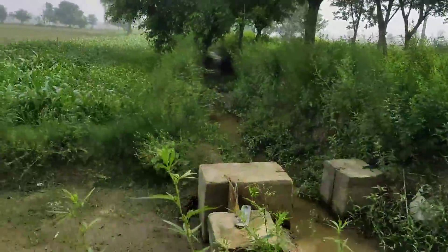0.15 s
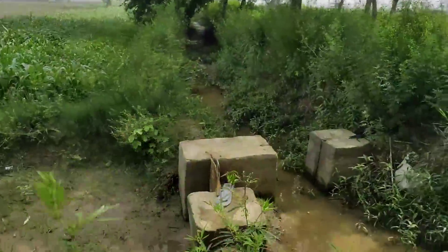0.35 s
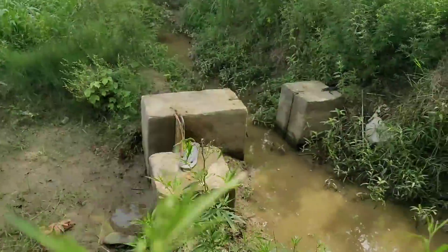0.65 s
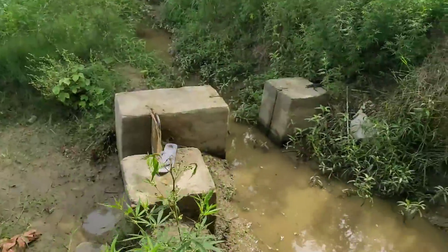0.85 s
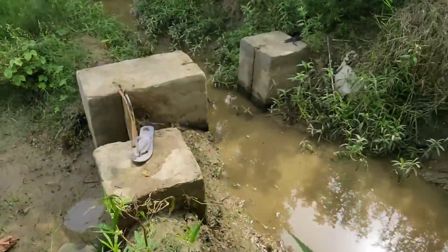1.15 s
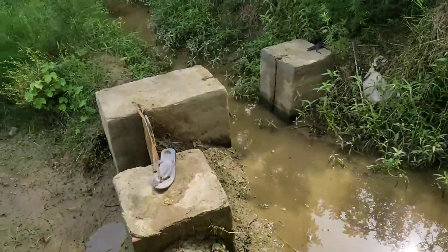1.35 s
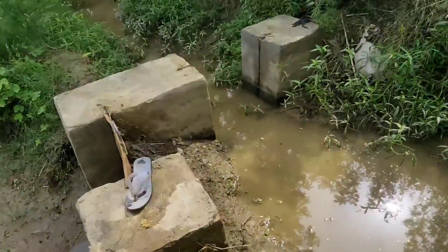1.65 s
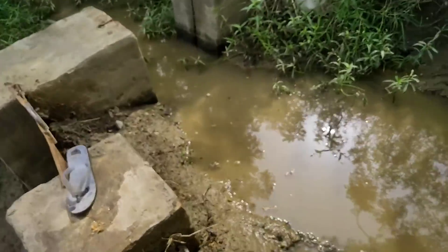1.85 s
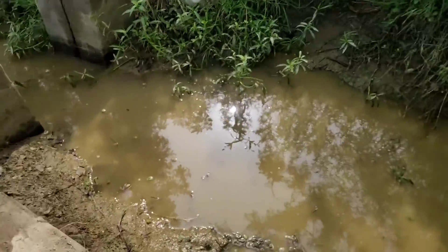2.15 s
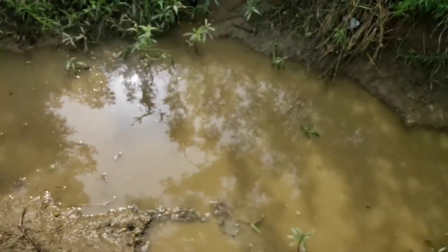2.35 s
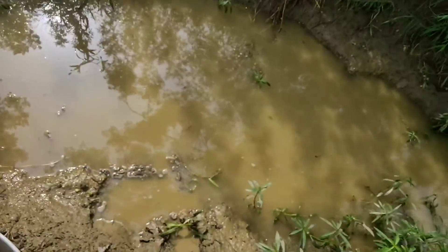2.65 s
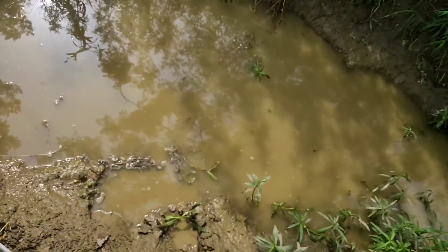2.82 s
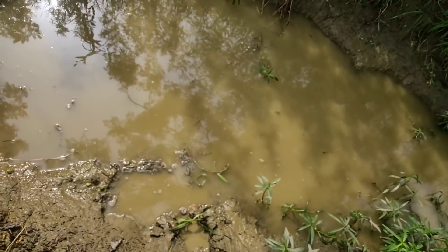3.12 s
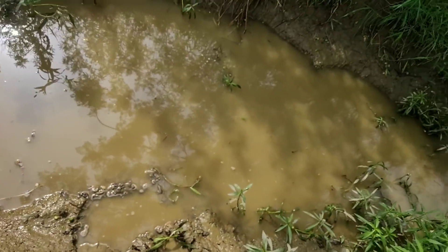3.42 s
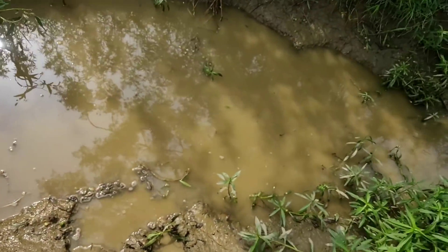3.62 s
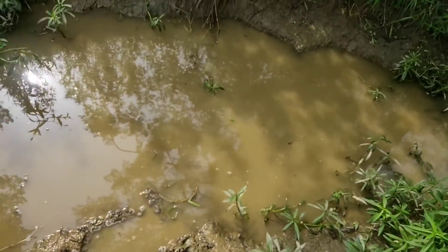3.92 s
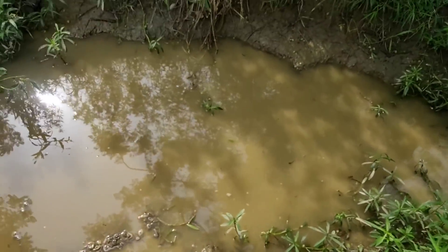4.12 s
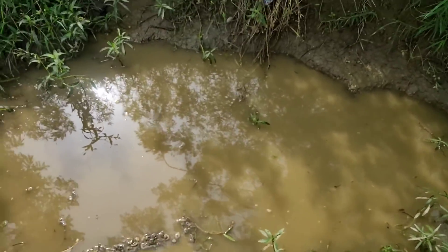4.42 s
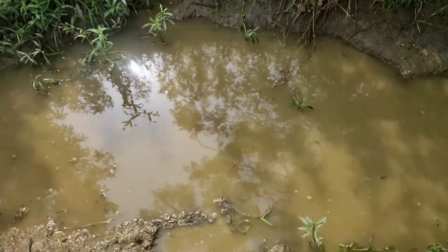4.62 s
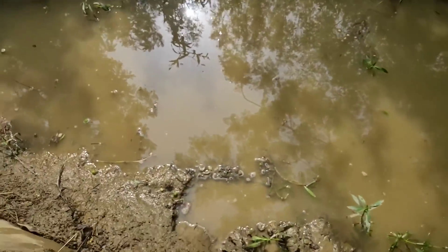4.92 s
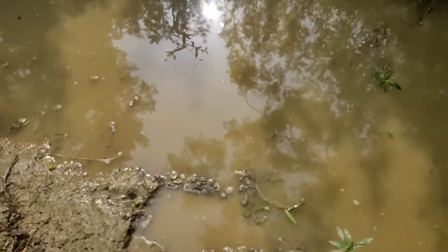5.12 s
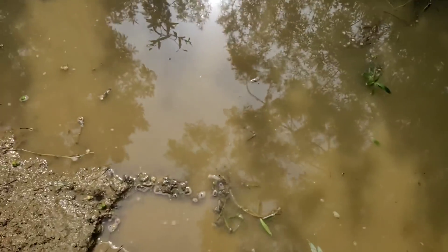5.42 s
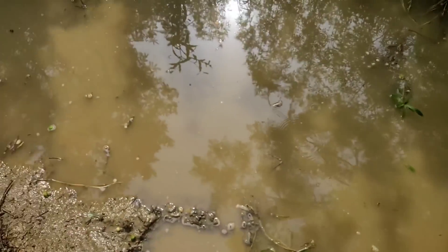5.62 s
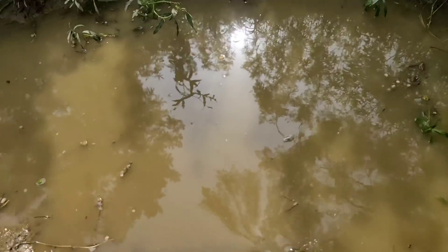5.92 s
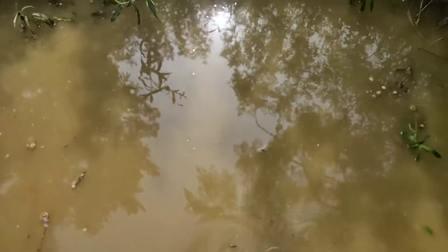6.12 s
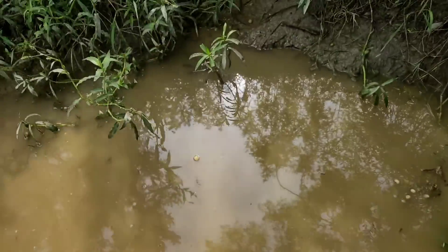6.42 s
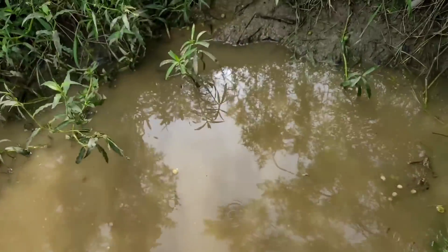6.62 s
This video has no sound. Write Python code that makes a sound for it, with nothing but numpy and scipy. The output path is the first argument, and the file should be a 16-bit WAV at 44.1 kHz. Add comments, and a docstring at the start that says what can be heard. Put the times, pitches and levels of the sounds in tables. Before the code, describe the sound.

Faint birds and rustling weeds around a sheet-metal bucket that knocks, scrapes and rattles its handle before dipping into shallow water.

```python
"""A wet field rustles, stems tick and a far bird whistles; a second one later chirps. From 1.3 s a
sheet-metal bucket is carried through the weeds, its wire handle striking the rim and exciting the shell's
modes. It is set down with a thud at 3.1 s and scrapes by stick-slip friction; at 4.3 s the handle drops
and bounces. From 5.9 s a muddy pool laps and spits round it, its bubbles ringing as resonators.
The left microphone is the brighter one and lies further from the bucket."""
import sys
import numpy as np
from scipy import signal
from scipy.fft import rfft, irfft, next_fast_len
from scipy.io import wavfile
from scipy.ndimage import uniform_filter1d, map_coordinates

SR = 44100
rng = np.random.default_rng(int(sys.argv[2]) if len(sys.argv) > 2 else 0)


def inscribe(sig):
    """Save sig as 16-bit PCM at rate SR to the path in sys.argv[1].

    A 1-D sig is mono; a 2-D sig holds one channel per row.
    Samples are clipped to [-1, 1] before scaling.
    """
    pcm = np.round(np.clip(np.atleast_2d(sig).T, -1, 1) * 32767)
    wavfile.write(sys.argv[1], SR, pcm.astype(np.int16))


N = 298557
TIME = np.arange(N) / SR
LEFT_RIGHT = np.array([[1], [-1]])


def amp(db):
    return 10 ** (np.asarray(db) / 20)


def unit_rms(x):
    return x / np.sqrt(np.mean(x ** 2) + 1e-20)


def along(points, hz):
    """Interpolation of (f, value) points on a logarithmic frequency axis."""
    f, value = np.transpose(points)
    return np.interp(np.log(hz + 1), np.log(f + 1), value)


def wobble(rate):
    """Smooth random modulation with rate knots a second."""
    return map_coordinates(rng.standard_normal(int(N * rate / SR) + 4), [TIME * rate])


def add(track, s, sound):
    """Superposition of a sound starting at time s."""
    part = track[..., round(s * SR):][..., :sound.shape[-1]]
    part += sound[..., :part.shape[-1]]


def filtered(x, response):
    """Linear filtering: the spectrum times a frequency response."""
    size = next_fast_len(N + SR // 2)
    return irfft(rfft(x, size) * response(np.fft.rfftfreq(size, 1 / SR)), size)[..., :N]


def lagged(x, lag_s):
    """Path difference: the left channel lags the right by lag_s."""
    return filtered(x, lambda f: np.exp(-1j * np.pi * f * lag_s * LEFT_RIGHT))


def noise(spectrum, coherence, patchy_db):
    """Partly coherent stereo noise, its gain varying in random patches of time and frequency."""
    def mid_side(hz):
        angle = np.arccos(np.clip(along(coherence, hz), -1, 1)) / 2
        return amp(along(spectrum, hz)) * [np.cos(angle), np.sin(angle)]
    white = signal.stft(rng.standard_normal((2, N)), nperseg=512)[2]
    patches = uniform_filter1d(uniform_filter1d(rng.standard_normal(white.shape[1:]), 6, 0), 8, 1)
    pair = signal.istft(white * amp(patchy_db * unit_rms(patches)), nperseg=512)[1][:, :N]
    mid, side = filtered(pair, mid_side)
    return np.array([mid + side, mid - side]) / np.std(mid)


def swells(rows, fall_db_per_s):
    """Exponential rise (40 dB), hold and decay: one envelope per level column, set by the loudest row."""
    s, rise, hold, *levels = np.transpose(rows)[:, :, None]
    t = TIME[::40]
    rise_db = -40 * np.maximum(s - t, 0) / np.maximum(rise, .003)
    fall_db = -fall_db_per_s * np.maximum(t - s - hold, 0)
    return [np.interp(TIME, t, amp(np.max(db + rise_db + fall_db, axis=0))) for db in levels]


# Spectra of far rumble, weeds, wet leaves and a faint high hiss: f/Hz, level/dB
RUMBLE = [(12, -38), (20, -23.5), (75, 2), (155, 0), (189, -2.5), (321, -6.5), (359, -13.5), (600, -20.5),
          (780, -49), (1320, -120)]
RUSTLE = [(240, -38), (400, -5.5), (1110, -1.5), (1380, -5), (1860, -1.5), (4500, -10.5), (5850, -28.5),
          (9900, -120)]
HISS = [(2350, -37), (4000, -20.5), (4700, -9), (5710, -1), (6460, 3), (7850, -2), (10000, -17),
        (13000, -48), (22000, -120)]
HIGH_HISS = [(5590, -32.5), (9500, -0.5), (11500, -4), (14900, -1), (16000, -11.5)]
# Envelope of the foliage: t/s, rustle level/dB, hiss level/dB
FOLIAGE_LEVEL = [(0.0, -61, -65), (0.71, -67.5, -65.5), (1.04, -59, -54.5), (1.42, -61, -64),
                 (1.99, -67.5, -67.5), (2.5, -70.5, -66.5), (2.71, -74, -69), (3.15, -81, -86),
                 (3.3, -70.5, -69), (4.3, -69.5, -75), (4.85, -77, -74), (5.18, -70, -68),
                 (5.5, -71, -68.5), (5.93, -73, -76), (6.45, -65, -71.5), (6.66, -67, -67)]
# Envelopes of the rumble and of the faint high hiss, which dies away after 4.5 s (re hiss): t/s, level/dB
RUMBLE_LEVEL = [(0.0, -58), (3.3, -58.5), (4.25, -55.5), (6.4, -53), (6.7, -58.5)]
HIGH_HISS_LEVEL = [(0.0, -9), (2.9, -9), (4.5, -7.5), (4.9, -22), (6.7, -31.5)]
# Likeness of left and right: f/Hz, coherence
COHERENCE = [(60, 1), (240, 0.3), (950, 0.54), (3770, 0.037), (15000, 0.03)]

def field():
    """Amplitude-modulated noise: far rumble, weeds brushing past and the hiss of wet leaves."""
    s, *levels = np.transpose(FOLIAGE_LEVEL)
    rustle_db, hiss_db = (np.interp(TIME, s, db) for db in levels)
    rumble_db = np.interp(TIME, *np.transpose(RUMBLE_LEVEL))
    high_hiss_db = hiss_db + np.interp(TIME, *np.transpose(HIGH_HISS_LEVEL))
    brush = wobble(19)
    return (amp(rumble_db + 1.8 * wobble(7.3)) * noise(RUMBLE, COHERENCE, patchy_db=2)
            + amp(rustle_db + .85 * brush) * noise(RUSTLE, COHERENCE, patchy_db=2)
            + amp(hiss_db + .6 * brush) * noise(HISS, COHERENCE, patchy_db=1.5)
            + amp(high_hiss_db + .8 * brush) * noise(HIGH_HISS, COHERENCE, patchy_db=-0.5))


# Rising whistles: t/s, duration/s, start f/Hz, end f/Hz, glide exponent, relative level/dB
SLIDES = [(0.308, 0.14, 1264, 1406, 0.44, -68.5), (1.14, 0.35, 1085, 1385, 1.3, -62)]
# Whistled phrases: t/s, duration/s, top f/Hz, relative level/dB
PHRASES = [(1.63, 0.22, 1170, -70), (1.93, 0.2, 1256, -63), (2.227, 0.22, 1309, -60),
           (2.536, 0.22, 1347, -60)]
# Contour of a phrase, two rising notes and a fall: share of duration, f over top f, level/dB
CONTOUR = [(0., .79, -4), (.31, .91, -5.5), (.48, .83, -9), (.66, 1.014, 1), (.82, .88, -2),
           (1., 0.682, -11.5)]

def whistler():
    """Frequency modulation: a bird's pure tone glides while its level wavers."""
    song = np.zeros(N)
    for s, length, low_hz, high_hz, bow, db in SLIDES:
        u = np.linspace(0, 1, round(length * SR))
        pitch = low_hz + (high_hz - low_hz) * u ** bow
        envelope = amp(db - 4.6 * (2 - u)) * np.sin(np.pi * u) ** .3
        add(song, s, envelope * np.sin(2 * np.pi * np.cumsum(pitch) / SR))
    share, bend, bend_db = np.transpose(CONTOUR)
    for s, length, top_hz, db in PHRASES:
        u = np.linspace(0, 1, round(length * SR))
        pitch = uniform_filter1d(top_hz * np.interp(u, share, bend), size=600)
        envelope = amp(db + np.interp(u, share, bend_db)) * np.sin(np.pi * u) ** .26
        add(song, s, envelope * np.sin(2 * np.pi * np.cumsum(pitch) / SR))
    return song * amp(8.5 + 2.3 * wobble(27))


def chirper(count=10, first_s=2.378, period_s=0.3692, start_hz=3800, fall_hz_per_s=25000):
    """Linear frequency sweeps: a small bird's evenly spaced falling chirps."""
    song, t = np.zeros(N), np.arange(round(0.041 * SR)) / SR
    chirp = np.hanning(len(t)) * np.sin(2 * np.pi * (start_hz * t - fall_hz_per_s * t * t / 2))
    for k in range(count):
        add(song, first_s + k * period_s, amp(rng.normal(-59.5, 1.5)) * chirp)
    return song


def birds(t60=0.3):
    """Scattering: the two far birds arrive directly and as diffuse echoes from trees."""
    song, t = whistler() + chirper(), np.arange(SR // 5) / SR
    trees = amp(-60 * t / t60) * rng.standard_normal((2, len(t)))
    echo = signal.fftconvolve(song[None], trees / np.linalg.norm(trees[0]), axes=1)[:, :N]
    return lagged(song, lag_s=0.00017) + amp(-11) * echo


# Ticks of stems and drops: t/s, relative level/dB, centre f/Hz, 30 dB decay/s, leftward bias/dB
TICKS = [(0.1465, -40.5, 1100, 0.005, -17), (0.15, -35, 6200, 0.003, -8), (0.156, -41, 1700, 0.0095, -21),
         (0.162, -35, 1600, 0.01, -16), (0.163, -49, 10000, 0.002, -12), (0.1681, -17.5, 830, 0.0056, -17),
         (0.1683, -28.5, 5560, 0.0018, -15.5), (0.18, -43, 2000, 0.011, -19),
         (0.289, -38.5, 2480, 0.002, 15), (0.443, -51, 6390, 0.004, 18), (0.517, -46, 1220, 0.0031, -24),
         (0.553, -50, 1200, 0.0059, -23), (2.328, -53, 1146, 0.0056, -4), (2.38, -51, 1280, 0.0042, 0),
         (2.79, -45, 6560, 0.0042, 10), (4.045, -47, 743, 0.0035, 1), (4.204, -48.5, 755, 0.0044, 0),
         (5.149, -36, 6600, 0.0035, 12.5), (5.18, -41, 1250, 0.0049, 13), (5.192, -38.5, 1130, 0.0059, 12),
         (5.332, -38.5, 7050, 0.003, 18), (5.387, -48, 6940, 0.004, 14), (5.525, -44.5, 7700, 0.0044, 18)]

def ticks():
    """Impulse excitation of a damped resonance; ticks biased to the right reach the left channel late."""
    out, t = np.zeros((2, N)), np.arange(SR // 20) / SR
    for s, db, hz, decay_s, pan_db in TICKS:
        snap = (rng.standard_normal(len(t)) + 6 * (t == 0)) * amp(-30 * t / decay_s)
        click = signal.lfilter(*signal.iirpeak(hz, 2.1 * (hz / 1000) ** 1.02, SR), snap)
        click = signal.lfilter(*signal.butter(2, min(3 * hz, 11000), fs=SR), click)
        click = signal.lfilter(*signal.butter(1, 0.63 * hz, 'high', fs=SR), click)
        click *= amp(db + 1.5) / np.abs(click).max()
        add(out[0], s + max(0, -pan_db) * 4e-5, amp((pan_db - 17) / 2) * click)
        add(out[1], s, amp((0.5 - pan_db) / 2) * click)
    return out


def bubble(t, hz, cycles, rise):
    """Bubble resonance: a damped sine whose pitch climbs as it nears the surface."""
    u = t * hz / cycles
    return np.sin(2 * np.pi * hz * t * (1 + rise * u)) * np.exp(-3 * u) * (1 - np.exp(-t * hz / 0.5))


# Drops in the pool: t/s, relative level/dB, f/Hz, spit level/dB re drop
DROPS = [(5.973, -47, 3300, 0), (5.994, -42, 5430, -13), (6.004, -32, 1730, -7.5), (6.026, -43, 3240, -4),
         (6.052, -44, 1610, 3), (6.075, -36, 1550, -7), (6.085, -41.5, 896, 4), (6.113, -30.5, 3580, -4),
         (6.127, -38, 2860, -13), (6.149, -38.5, 1000, -21), (6.172, -41, 3980, -9),
         (6.195, -29.5, 4690, -9), (6.204, -36.5, 1000, -10), (6.22, -30, 1135, -4), (6.237, -40, 3340, -5),
         (6.26, -43, 826, -12), (6.277, -38, 905, -3.5), (6.288, -34, 1620, -0.5), (6.297, -34.5, 482, -14),
         (6.308, -36.5, 636, -16), (6.316, -31.5, 790, -26), (6.314, -40, 3460, -11),
         (6.333, -36, 860, -15.5), (6.351, -40.5, 1160, -6.5), (6.437, -42, 1033, -12),
         (6.688, -53, 3380, 11), (6.704, -34, 884, -10), (6.754, -31, 805, -25), (6.761, -32, 1200, -11),
         (6.48, -51, 2850, -21)]
# Splashes: full at t/s, rise/s, hold/s, relative level/dB
SPLASHES = [(5.958, 0.018, 0.39, -56), (6.222, .015, 0.025, -49), (6.286, 0.018, 0.0096, -47),
            (6.43, 0.029, 0.012, -60), (6.706, 0.074, .07, -46.5)]
# Spectrum of the spray: f/Hz, level/dB
SPRAY = [(350, -38), (700, -3), (2000, -12), (3500, -9), (4360, -19.5), (6290, -0.5), (10800, -25),
         (14800, -22), (16200, -34)]

def water(bubbles=700, start_s=5.9):
    """Free oscillation of bubbles: one per drop, with a spit of spray, and a fizz of many per splash."""
    drops, spit, fizz = np.zeros(N), np.zeros(N), np.zeros((2, N))
    t = np.arange(SR // 25) / SR
    for s, db, hz, spit_db in DROPS:
        cycles = 11 + 3.5 * np.log2(hz / 1000)  # smaller bubbles ring more cycles
        add(drops, s, amp(db + .5) * bubble(t, hz, cycles, rise=0.06))
        add(spit, s, amp(db + spit_db + 1.5 - 60 * t / 0.009))
    for when, pitch, size, pan in rng.random((bubbles, 4)):
        blip = amp(11.5 * size ** 3) * bubble(t[:600], 700 * 12 ** pitch, cycles=4.5, rise=0.15)
        add(fizz, start_s + when * (N / SR - start_s), blip * amp(22 * (pan - .5) * LEFT_RIGHT))
    fizz /= np.std(fizz[:, round(start_s * SR):])
    splash = swells(SPLASHES, fall_db_per_s=303)[0]
    spray = (spit + amp(-2) * splash) * noise(SPRAY, [(6000, 0.1)], patchy_db=4)
    return lagged(drops, lag_s=-0.000072) + amp(-6) * splash * fizz + spray


def jolt(s=3.56, hz=31):
    """Structure-borne sound: a heavy blow at 3.56 s jars the hand holding the microphones, mostly the right."""
    out, cycles = np.zeros((2, N)), np.arange(SR // 8) / SR * hz
    push = amp(-29) * np.sin(2 * np.pi * cycles) * np.exp(-1.6 * cycles)
    add(out, s, push * np.array([[.25], [1]]))
    return out


def ring(modes, t, length, chance, near_hz, spread_db, lean_db, floor_db, scatter):
    """Modal superposition, peak 1: modes lose lean_db an octave from near_hz, floor_db at most."""
    hz, db, t60 = np.transpose(modes)[:, :, None]
    strength, balance, turn, start, bend = chance[:, :len(hz), None]
    hz = hz * (1 + .009 * bend)  # the thin shell flexes in the grip, detuning each blow
    side = LEFT_RIGHT[:, None] * np.clip(hz / 900, .3, 1)  # short waves differ more between channels
    loss_db = np.minimum(lean_db * np.abs(np.log2(hz / near_hz)), floor_db)
    db = db - loss_db + spread_db * strength + 0.87 * side * balance
    phase = 2 * np.pi * hz * t + 0.52 * side * turn + scatter * start
    tone = np.sum(amp(db - 60 * t / (t60 * length)) * np.sin(phase), axis=1)
    tone *= 1 - np.exp(-t / 0.00038)
    return tone / np.abs(tone).max()


# Modes of the base and air, the side wall and the wire handle: f/Hz, level/dB, nominal T60/s
BODY = [(106, 2.5, 0.22), (207.6, 0, 0.19), (248, 3, 0.067), (310, 4, 0.095), (366, -11.5, 0.26)]
WALL = [(560, -9, .05), (715, -5, .07), (782.5, 0, 0.19), (860, -7, .07), (926, -4, .09), (973, -4, 0.18),
        (1082, -6, 0.097), (1235, -10, 0.26), (1340, -9.5, 0.24), (1410, 0.5, 0.044), (1513, -13.5, 0.17),
        (1761, -15, 0.3), (1794, -16, .3), (1895, -10, 0.17), (2020, -14.5, 0.2), (2160, -10.5, 0.13),
        (2233, -12, 0.17), (2295, -9.5, 0.1), (2416, -14, 0.13), (2485, -17.5, 0.28), (2600, -13.5, 0.055),
        (2940, -17, 0.2), (3085, -19, 0.12), (3280, -14, 0.086)]
WIRE = [(5070, -10, 0.071), (5420, -4, .12), (5640, -7.5, 0.13), (6000, -3.5, 0.04), (6340, -7, 0.12),
        (6690, 1, 0.084), (6480, 0, 0.093), (7000, -7.5, 0.11), (7400, -5.5, 0.14), (8800, -13.5, 0.15),
        (7600, -27.5, 0.047), (8250, -15, 0.11)]

def struck_modes(blows, set_down_s=3.1, let_go_s=4.25):
    """Free vibration after each impact; the ground damps the wall while the bucket is pressed down."""
    tones, t = np.zeros((2, N)), np.arange(SR // 5) / SR
    chances = rng.standard_normal((len(blows), 3, 5, len(WALL)))
    for (s, db, body_db, wall_db, _, body_hz, wall_hz, length), chance in zip(blows, chances):
        length = max(length, .1)
        body_length = 1.015 * length
        wall_length = 0.9 if s < set_down_s else (0.7 if s < let_go_s else 0.85) * body_length
        body = ring(BODY, t, body_length, chance[0], body_hz,
                    spread_db=2.5, lean_db=26.5, floor_db=17, scatter=0)
        wall = ring(WALL, t, wall_length, chance[1], wall_hz,
                    spread_db=2.2, lean_db=28, floor_db=10.5, scatter=1.4)
        wire = ring(WIRE, t, length, chance[2], 6300, spread_db=-1.5, lean_db=8, floor_db=5, scatter=0.88)
        body *= 1 - np.exp(-t / 0.0018)
        add(tones, s, amp(db) * (amp(body_db + 10) * body + amp(wall_db + 6.5) * wall + amp(-16) * wire))
    return tones


def rubbed(modes, force, damping, top_hz):
    """Forced vibration of modes that the contact also damps; a soft contact is dull above top_hz."""
    def response(f):
        peaks = 0
        for hz, db, t60 in modes:
            loss = 1j * f * damping / t60
            peaks += amp(db) * np.sqrt(t60) * loss / (hz * hz - f * f + loss)
        return peaks / (1 + 1j * f / top_hz) ** 2
    return unit_rms(filtered(force, response))


# Strokes over ground and weeds: full at t/s, rise/s, hold/s, relative level/dB of scuff, body, wall
STROKES = [(1.458, 0.017, 0.016, -59, -50, -40), (1.598, 0.036, 0.15, -62.5, -62, -62.5),
           (2.13, .04, 0.082, -61.5, -60.5, -54), (2.39, 0.15, 0.023, -58, -70, -58),
           (2.455, 0.056, 0.011, -56, -55, -43.5), (3.345, 0.051, 0.033, -59, -49, -52.5),
           (3.45, 0.058, 0.042, -51, -40, -43), (3.515, 0.15, 0.13, -43, -39, -31),
           (3.661, 0.0096, 0.058, -17.5, -45, -31.5), (3.79, 0.18, 0.0026, -36.5, -41, -35),
           (3.86, 0.085, 0.12, -41, -49, -38), (4.0, 0.046, 0.11, -57.5, -50, -44),
           (4.122, 0.3, 0.0086, -47, -50, -40.5), (6.59, 0.19, 0.036, -58, -43.5, -47.5),
           (6.708, 0.033, .07, -47.5, -54.5, -43.5)]
# Spectrum of the rim dragged over grit: f/Hz, level/dB
SCUFF = [(2240, -43.5), (3800, -22), (4700, -15), (5400, -1), (5990, 0.5), (7820, -5.5), (10200, -30.5),
         (10500, -32), (11300, -20), (14900, -19), (16200, -68)]

def scraping():
    """Stick-slip friction: gives shell tones, scuff with handle rattle, and the dense wall modes' drive."""
    rim, body, wall = swells(STROKES, fall_db_per_s=450.5)
    grit = amp(4 * wobble(160) + 2.2 * wobble(50) - 2)  # the contact catches and slips
    friction = noise([(1000, 0)], [(150, 0.99), (3000, 0.38)], patchy_db=2)
    slips = grit * friction
    tones = amp(-0.5) * body * rubbed(BODY, friction, damping=6.8, top_hz=536)
    tones += amp(-5.5) * wall * rubbed(WALL, slips, damping=3.3, top_hz=3980)
    scuff = amp(-6) * grit ** 0.73 * noise(SCUFF, [(6000, 0.16)], patchy_db=5)
    rattle = amp(-7) * rubbed(WIRE, slips, damping=1.2, top_hz=9000)
    return tones, rim * (scuff + rattle), amp(-13.5) * wall * grit


# Spectra of the dense wall, rim and high modes: f/Hz, level/dB
CLATTER = [(260, -25), (450, -15), (787, -8), (1080, -10.5), (2180, -13), (2800, -23.5), (3640, -45.5),
           (6160, -120)]
BITE = [(1590, -26), (2700, 0), (3550, -5), (4660, -5), (5000, -2), (6500, -26), (11000, -120)]
SIZZLE = [(2820, -52.5), (4800, -18.5), (5980, 4), (7870, -4.5), (10300, -22.5), (10600, -25), (12800, -23),
          (14900, -29), (15900, -37.5), (16200, -60.5)]

def dense_modes(blows, wall_drive):
    """Modal overlap: closely spaced resonances merge into noise that decays after each blow."""
    clatter, bite, sizzle = np.zeros((3, N))
    t = np.arange(SR // 5) / SR
    rise = 1 - np.exp(-t / 0.00028)  # the wire flattens against the rim
    crack = amp(-60 * t / 0.029)  # the first touch
    for s, db, _, wall_db, bite_db, _, _, length in blows:
        decay_db = -60 * t / max(length, .1)
        add(clatter, s, rise * amp(db + wall_db - 17) * (amp(decay_db / 0.28) + 1.8 * crack))
        add(bite, s, rise * amp(db + bite_db - 7.5) * (amp(decay_db / 0.23) + 0.47 * crack))
        add(sizzle, s, rise * amp(db - 19.5) * (amp(decay_db / 0.21) + 4.1 * crack))
    return ((clatter + wall_drive) * noise(CLATTER, [(1000, 0.13)], patchy_db=1)
            + bite * noise(BITE, [(4000, 0.36)], patchy_db=1)
            + sizzle * noise(SIZZLE, [(6000, 0.19)], patchy_db=3))


# First landing of the handle: t/s, relative level/dB, offsets/dB of body, wall, bite,
# favoured body f/Hz, decay time factor
HANDLE_DROP = (4.3195, -13, -16, -7, -16.5, 203, 1.13)
# Wall mode favoured by each landing: f/Hz
LANDING_HZ = [1400, 2150, 2600, 1400]

def bounces(flight_s=0.234, restitution=0.56, loss_db=10, dulling_db=2.5, shortening=0.7):
    """Inelastic rebound: the dropped handle lands ever sooner, weaker and duller."""
    s, db, *offsets_db, body_hz, length = HANDLE_DROP
    return [(s + flight_s * (1 - restitution ** k) / (1 - restitution), db - loss_db * k,
             *(np.array(offsets_db) + dulling_db * k), body_hz, wall_hz, length * shortening ** k)
            for k, wall_hz in enumerate(LANDING_HZ)]


# Blows on the bucket: t/s, relative level/dB, offsets/dB of body, wall, bite,
# favoured body f/Hz, favoured wall f/Hz, decay time factor
BLOWS = [(1.345, -50, 3, -1, -6.5, 330, 2400, 0.57), (1.3724, -53.5, 0.5, 5, -4, 318, 1317, 1),
         (1.454, -52, -15, 12, -6.5, 310, 1000, 0.3), (1.483, -5, -35, -16, -9.5, 120, 1780, 0.42),
         (1.4865, -32, -20.5, 4.5, -17, 106, 1085, 0.7), (1.495, -36, -19.5, 3, -9, 106, 2600, 0.5),
         (1.5912, -40.5, 0, -11, -11, 248, 1740, 0.67), (2.0984, -54, 7, 8, -14, 329, 766, 0.6),
         (2.4244, -52.5, 4, 9, -10, 254, 1370, 1), (2.4444, -57, -14, 0, -18, 216, 1390, 0.7),
         (3.1484, -42.5, 34, 21, -4, 225, 900, 0.45), (3.1527, -52, 37, 8.5, -8, 243, 975, 0.42),
         (3.158, -47, 26.5, 14, -4, 106, 975, 0.53), (3.1885, -51, 25, 10, -4, 272, 1400, 0.83),
         (3.1793, -23.5, 4.5, -10.5, -21, 250, 1250, 0.46),
         (3.3336, -38.5, -14, -1.5, -12.5, 366, 1350, 0.5),
         (3.3628, -35.5, -1.5, -15.5, -22.5, 314, 1320, 1), (3.4446, -37, 5, -4.5, -15, 205, 1650, 1),
         (3.4764, -38, 6, 1, -8, 307, 1620, 1), (3.5104, -27, 2.5, -1.5, -9, 202, 2160, 0.57),
         (3.5586, -12, -3.5, -5.5, -15.5, 280, 1653, 0.91),
         (3.5643, -8, -17.5, -13.5, -17, 104, 1668, 0.09), (3.5754, -8, -15, -23, -18, 311, 2130, 0.72),
         (3.6584, -12.5, -13.5, -12.5, -18, 360, 1250, 0.38),
         (3.6625, -12, -25, -17.5, -31, 106, 782, 0.22), (3.6804, -15, -28.5, -18, -28, 310, 782, .6),
         (3.6976, -13, -26, -32, -32, 96.9, 1300, 1), (3.7055, -15, -30, -26, -32, 106, 782, .6),
         (3.718, -19, -28, -24, -30, 106, 1300, .5), (3.7788, -30.5, -1, -15, -19, 309.5, 1350, 0.86),
         (3.8342, -39, -0.5, -5, -12, 200, 1280, 0.7), (3.8581, -34, -10, -15, -20, 213, 1250, 0.8),
         (3.9124, -43, -20, 9, -10, 190, 926, 0.1), (3.9366, -42.5, -23, -10, -5, 188, 1870, 1),
         (3.969, -41, -22, -14, -3, 310, 1235, 0.5), (3.9844, -41, -6, 4.5, -14, 314, 1440, 0.85),
         (4.1294, -53, 9.5, 10, -14, 330, 1240, 1), (4.0937, -44.5, 2.5, 0, -10.5, 310, 1235, 0.67),
         (4.3225, -30, -26, 10, -16, 203, 2150, 0.4), (4.333, -37, -13, 13.5, -10, 204, 800, 1),
         (4.56, -41.5, 3.5, 11.5, -13.5, 204.6, 980, 0.85), (4.6114, -47.5, 7, 10, -17.5, 205, 2485, 0.74),
         (4.772, -49.5, -2, 5, -11.5, 204, 2150, 0.58), (4.7082, -44.5, 1, 4, -11, 208, 2480, 0.93),
         (4.797, -50.5, 4, 4, -14, 199, 1430, 0.68)]

def bucket(cutoff_hz=45):
    """Radiation from a struck and scraped shell, too small to radiate deep bass."""
    blows = BLOWS + bounces()
    struck = struck_modes(blows)
    scraped, scuff, wall_drive = scraping()
    tones = filtered(struck + scraped, lambda f: (1j * f / (cutoff_hz + 1j * f)) ** 2)
    return lagged(tones + scuff + dense_modes(blows, wall_drive), lag_s=0.000345)


def scene():
    """Linear superposition of all sources."""
    return bucket() + jolt() + ticks() + water() + birds() + field()


# Imbalance of the microphones: f/Hz, left minus right level/dB
IMBALANCE = [(60, -2.5), (150, -0.5), (380, 1), (950, 4), (2380, 3.5), (5980, 7.5), (15000, 2.5)]

def record(dry, ceiling=.9, top_hz=16300):
    """Transduction: unequal frequency responses, soft saturation of the peaks, and a band limit."""
    def microphones(hz):
        pair = amp(along(IMBALANCE, hz) * LEFT_RIGHT / 2)
        return pair / pair.mean(axis=0)
    coloured = filtered(dry, microphones)
    rounded = coloured / (1 + np.abs(coloured / ceiling) ** 4) ** .25
    return filtered(rounded, lambda hz: hz < top_hz)


dry = scene()
out = record(dry)
inscribe(out)
```